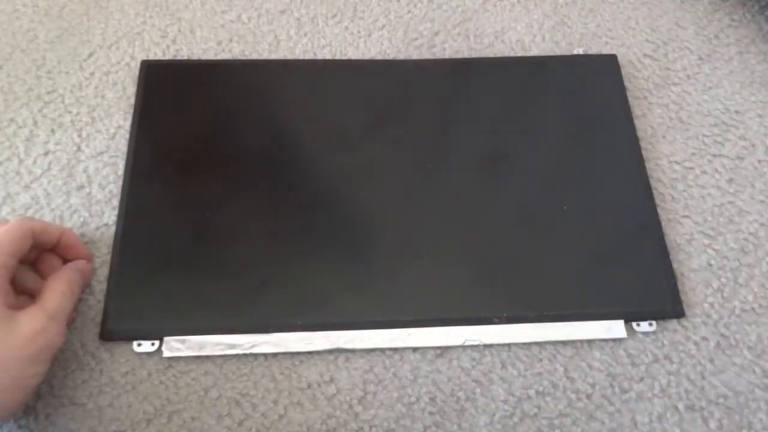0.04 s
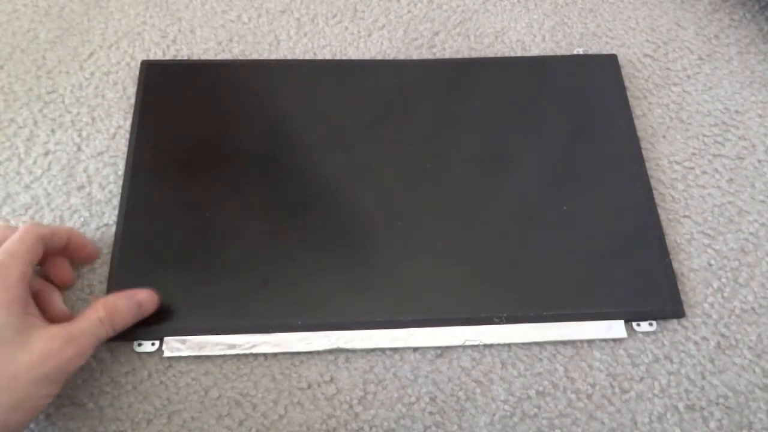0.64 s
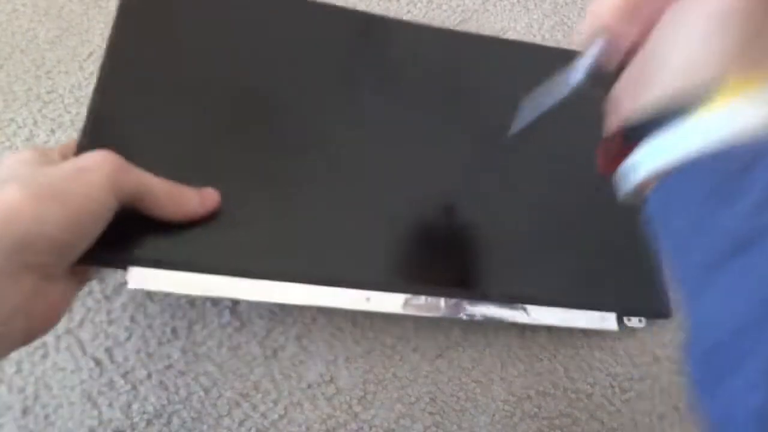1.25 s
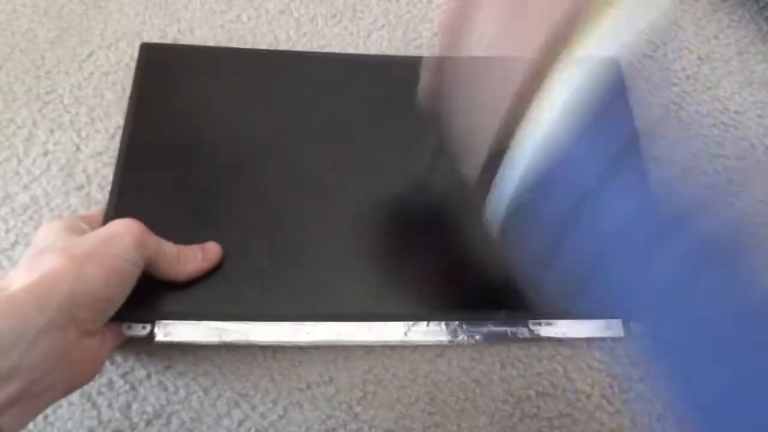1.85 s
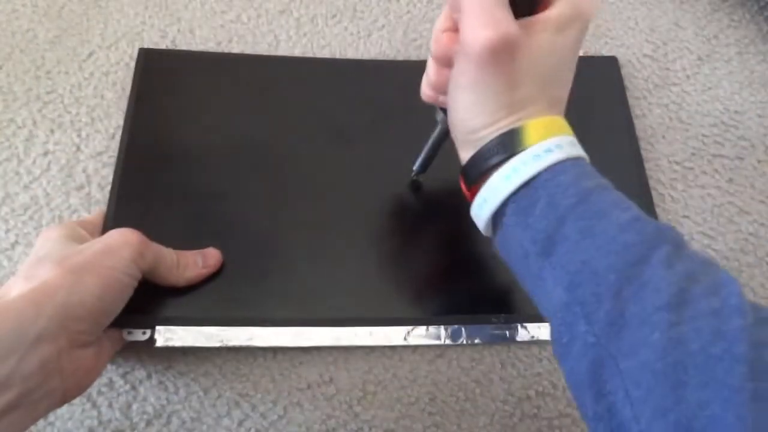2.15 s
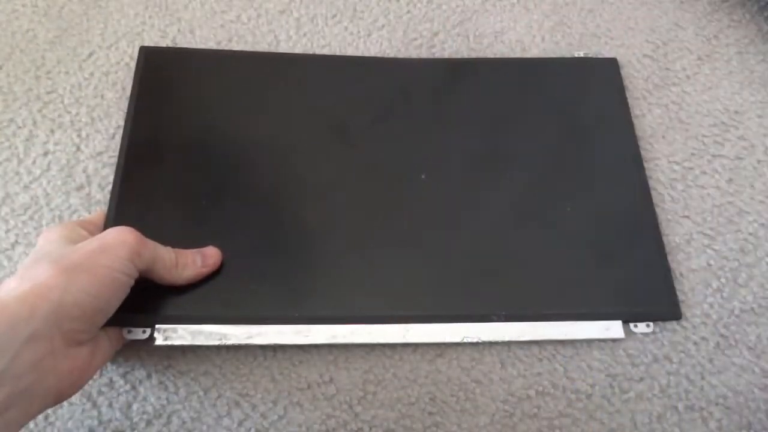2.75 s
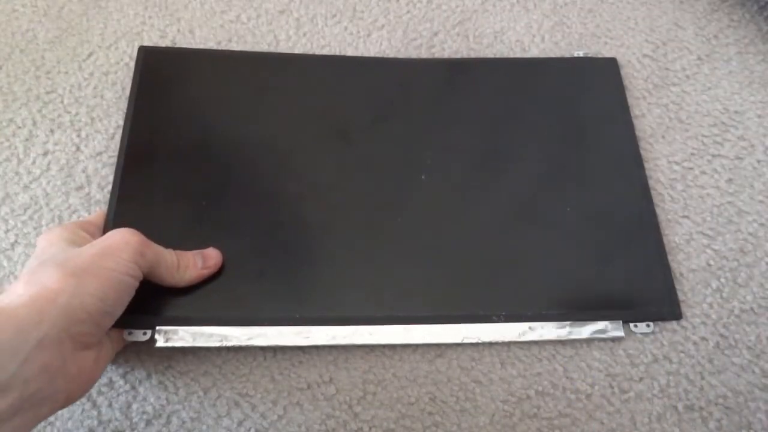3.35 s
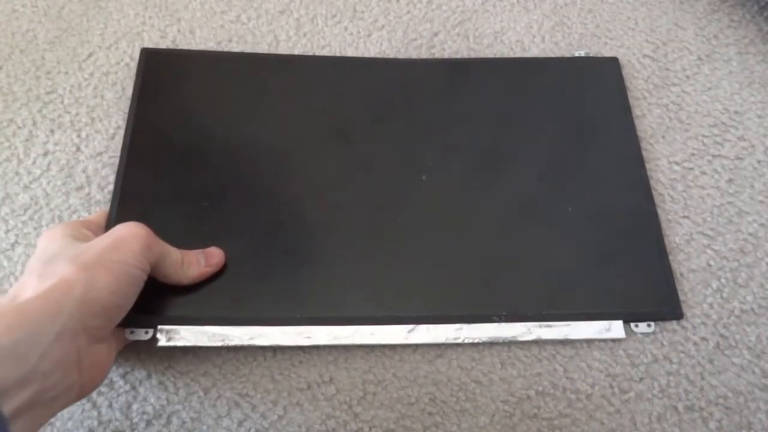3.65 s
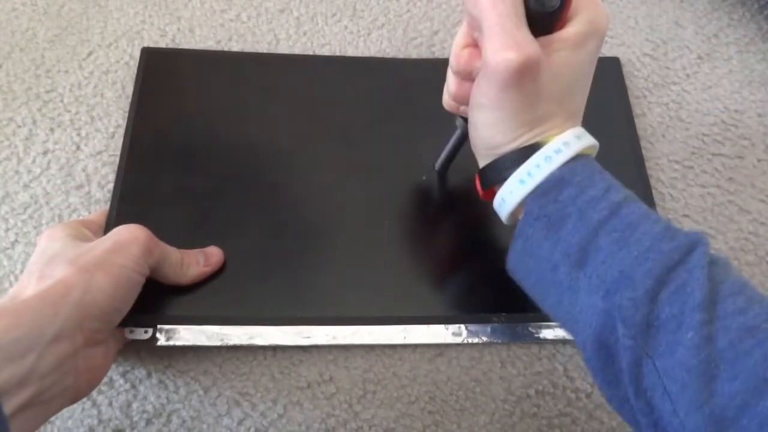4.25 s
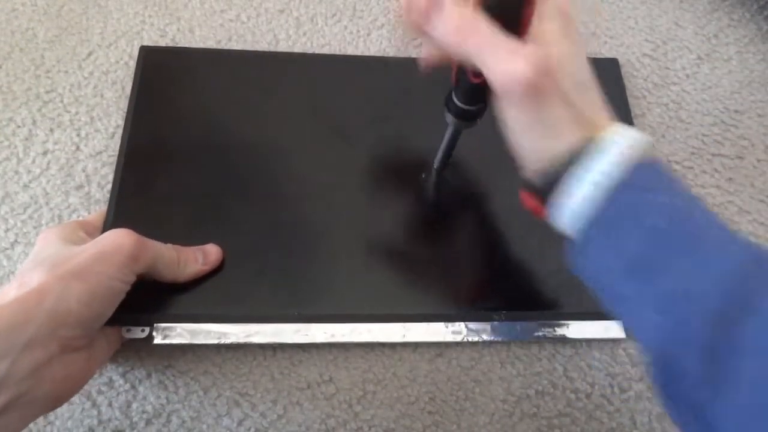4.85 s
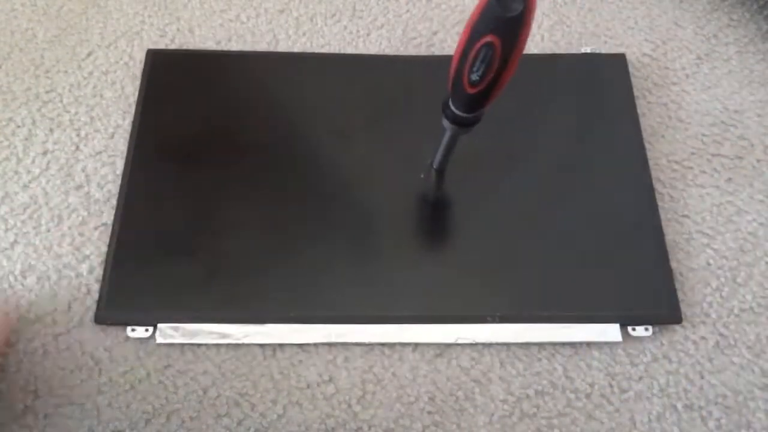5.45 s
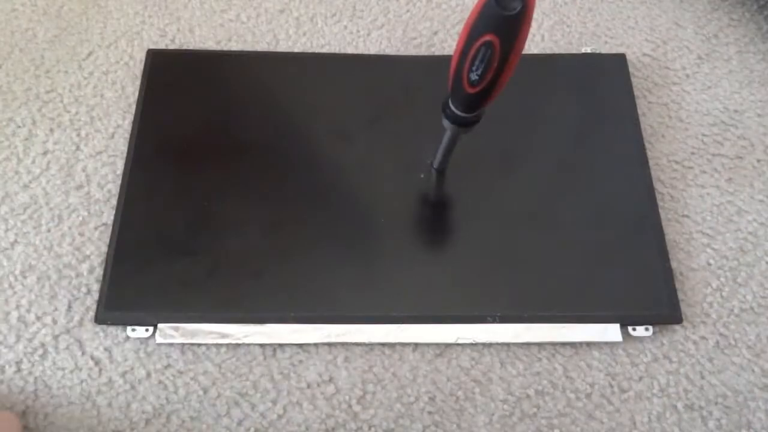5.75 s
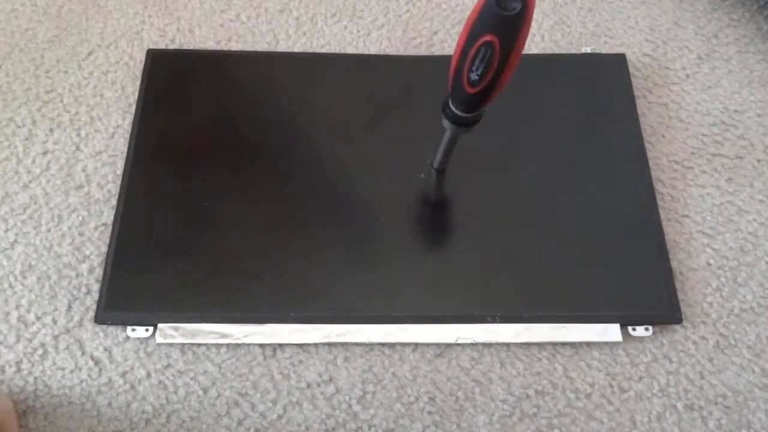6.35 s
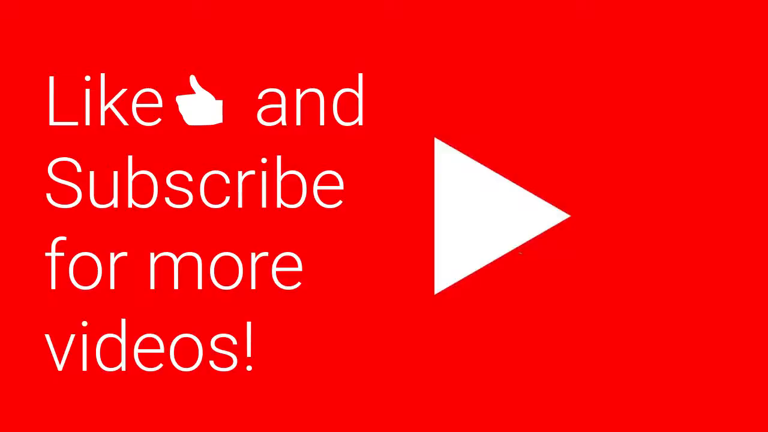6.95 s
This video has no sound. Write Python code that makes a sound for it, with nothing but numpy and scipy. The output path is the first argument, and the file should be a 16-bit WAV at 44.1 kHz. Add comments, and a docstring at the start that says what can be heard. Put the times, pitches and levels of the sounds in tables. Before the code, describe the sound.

A faint steady hiss fills a small room. At the very start, a laptop screen settles on carpet with a few soft knocks and ticks, and a sleeve rustles faintly around 1 second. After a small tick, a screwdriver stabs the screen at about 1.9 seconds: the glass cracks and crunches, the thin panel flaps and rings briefly, and the floor gives a dull thud, with a short echo. Light ticks and knocks follow between 2.3 and 2.9 seconds, the sharpest near 2.75. A second, similar stab lands at about 3.9 seconds. The damaged glass gives a little cluster of ticks around 4.8 seconds. Cloth rustles softly from 5 to 5.6 seconds, while fingers begin to rub and rumble on the camera. From 6 to 7 seconds they make close, dry bumps and clicks, strongest near 6.7, much quieter than the stabs.

```python
"""First come a faint hiss and a few ticks and knocks from a laptop screen lying on carpet in a small room.
A sleeve rustles, then a screwdriver is stabbed into the screen twice. Each stab cracks and crunches
the glass, makes the thin panel flap and ring, and thuds into the floor; the room echoes briefly.
The damaged glass keeps ticking now and then, and fingers softly rub, bump and click on a camera."""
import sys
import numpy as np
from scipy import signal
from scipy.fft import rfft, irfft, next_fast_len
from scipy.io import wavfile
from scipy.ndimage import uniform_filter1d

SR = 44100
rng = np.random.default_rng(int(sys.argv[2]) if len(sys.argv) > 2 else 0)


def dump(signal):
    """Clip the signal to [-1, 1] and save it as 16-bit WAV at the path in sys.argv[1]."""
    limited = np.clip(np.atleast_2d(signal).T, -1, 1)
    pcm = np.round(limited * 32767).astype(np.int16)
    wavfile.write(sys.argv[1], SR, pcm)


N = 312613
TIME = np.arange(N) / SR


def amp(db):
    """Turns decibels into a number to multiply by."""
    return 10 ** (np.asarray(db) / 20)


def unit(x):
    """Scales a signal to an average strength (rms) of one."""
    return x / np.sqrt(np.mean(x ** 2) + 1e-20)


def read(table, hz):
    """Looks up a value between a table's rows, on a scale of octaves."""
    f, value = np.transpose(table)
    return np.interp(np.log(hz + 1), np.log(f + 1), value)


def add(mix, s, sound):
    """Mixes a sound in at s seconds."""
    part = mix[..., max(round(s * SR), 0):][..., :sound.shape[-1]]
    part += sound[..., :part.shape[-1]]


def swell(s, rise, fall):
    """A smooth rise and fall in level that peaks at s seconds."""
    return np.exp(-((TIME - s) / np.where(TIME < s, rise, fall)) ** 2)


# How alike left and right are for most sounds: f/Hz, likeness (0 to 1)
USUAL_LIKENESS = [(50, .998), (130, .98), (500, .92), (1500, .78), (10000, .8)]

def coloured(pair, db_at, likeness=USUAL_LIKENESS):
    """Gives two unrelated noises a tone colour and blends them into left and right."""
    hz = abs(np.fft.fftfreq(pair.shape[1], 1 / SR))
    alike = np.clip(read(likeness, hz), 0, 1)
    log_gain = np.log(amp(db_at(hz)) + 1e-5)
    response = np.exp(np.conj(signal.hilbert(log_gain)))  # rings after its cause, never before
    mid, side = np.fft.ifft(np.fft.fft(pair) * response * np.sqrt([1 + alike, 1 - alike])).real
    return np.array([mid + side, mid - side])


def noise(colour, likeness=USUAL_LIKENESS, grain_db=0):
    """Stereo noise of a given tone colour; grains of uneven size make it crackle."""
    shape = (2, next_fast_len(N))
    grains = rng.standard_normal(shape) * amp(grain_db * np.minimum(rng.exponential(1, shape), 6))
    return unit(coloured(grains, lambda hz: read(colour, hz), likeness)[:, :N])


# Tone colour of the hiss: f/Hz, level/dB
HISS_COLOUR = [(20, 4), (35, -5), (60, -8), (100, -12.5), (160, -14.5), (300, -16), (510, -16), (2100, -17),
               (5000, -20), (10000, -23), (14500, -27), (15800, -30.5)]
# How alike its left and right are: f/Hz, likeness (0 to 1)
HISS_LIKENESS = [(50, 1), (200, 0.98), (600, 0.64), (2000, 0.92), (5000, 1), (12000, 1)]
# Tones of the mains hum: f/Hz, level/dB
HUM_TONES = [(60, -77), (120, -74), (240, -82)]

def hiss_and_hum():
    """A microphone hisses steadily over the faint hum of mains power."""
    hum = sum(amp(db) * np.sin(2 * np.pi * hz * TIME) for hz, db in HUM_TONES)
    return amp(-58.5) * noise(HISS_COLOUR, HISS_LIKENESS) + hum


# Shifts of the hand: peak t/s, length/s, rumble level/dB, rubbing level/dB
GRIP_SHIFTS = [(3.8, 0.58, -71, -66.5), (4.55, .1, -52.5, -69), (4.85, 0.38, -70, -67),
               (5.126, 0.11, -48.5, -63), (5.31, 0.13, -54.5, -64), (5.97, .28, -52.5, -64),
               (6.19, 0.15, -46.5, -62.5), (6.453, 0.43, -52.5, -79), (6.809, .05, -48, -46),
               (6.87, .12, -46.5, -64), (7.02, .14, -53, -62.5)]
# Tone colours of the rumble and the rubbing: f/Hz, level/dB
RUMBLE_COLOUR = [(6, -22), (11, 16), (25, 1), (49, -5), (97, -10.5), (200, -21), (260, -60), (440, -120)]
RUBBING_COLOUR = [(100, -2), (230, -2), (350, 8.5), (450, -5.5), (650, -8), (1500, -32)]

def grip():
    """A hand rumbles and rubs on the camera body each time it shifts."""
    rumble, rubbing = amp(-74.5), 0  # even a still hand rumbles a little
    for s, length, rumble_db, rubbing_db in GRIP_SHIFTS:
        shift = swell(s, length / 2, length / 2)
        rumble += amp(rumble_db) * shift
        rubbing += amp(rubbing_db) * shift
    return rumble * noise(RUMBLE_COLOUR) + rubbing * noise(RUBBING_COLOUR)


def flex(hz, decay, rise=0.00044):
    """A bent sheet or shell swings back and forth and quickly stops."""
    t = np.arange(SR // 5) / SR
    return np.sin(2 * np.pi * hz * t) * np.exp(-t / decay) * (1 - np.exp(-t / rise))


# Knocks of the panel: t/s, level/dB, f/Hz, fade time/s
SETTLING_KNOCKS = [(0.0896, -29, 383, .0013), (.095, -40.5, 78, .014), (.105, -33, 308, 0.0055),
                   (.1068, -35, 706, .0021), (.236, -49.5, 780, .005), (2.306, -32.5, 488, 0.0019),
                   (2.3212, -46, 520, .002), (2.6069, -34.5, 447, .0022), (2.608, -38, 935, 0.0027),
                   (2.772, -38.5, 140, .0042), (2.782, -34, 270, .0028)]

def panel_knocks():
    """The panel knocks softly as it settles on the carpet."""
    out = np.zeros((2, N))
    for s, db, hz, decay in SETTLING_KNOCKS:
        add(out, s, amp(db) * flex(hz, decay))
    return out


# How alike left and right are for sharp, close sounds: f/Hz, likeness (0 to 1)
SNAP_LIKENESS = [(500, .95), (2000, 0.96), (10000, 0.98)]

def snap(decay, db_at, size=2048):
    """A burst of tiny breaks that dies within milliseconds."""
    fade = np.exp(-np.arange(size) / SR / decay)
    spectrum = rfft(rng.standard_normal((2, size)) * fade)
    burst = irfft(spectrum / np.sqrt(abs(spectrum) + 1e-12)) * np.sqrt(fade)  # no one pitch stands out
    return unit(coloured(burst, db_at, SNAP_LIKENESS)) * np.sqrt(np.mean(fade ** 2))


def tick(db, hz, spread, decay, body):
    """A small snap around one pitch, coloured by the object it runs through."""
    def db_at(f):
        octaves_away = np.log2((f + 1) / hz)
        return read(body, f) - 10 * np.log10(1 + (octaves_away / spread) ** 4)
    return amp(db) * snap(decay, db_at)


# Small ticks: t/s, level/dB, f/Hz, spread/octaves, fade time/s, left over right/dB, echo level/dB
PANEL_TICKS = [(.0938, -37, 5000, 2.4, 0.0039, -4, -3.5), (.0955, -36.5, 9300, 0.099, .0024, -5, -5.5),
               (0.1057, -32, 2500, 2.4, 0.0023, -5, -7.5), (1.7197, -29, 4900, 0.93, .002, 2, -12.5),
               (1.8470, -52, 4500, 0.6, .002, 0, -12), (2.3055, -40.5, 6000, 1.4, 0.0025, 2, -17),
               (2.6083, -39.5, 1490, 1.6, .0014, 0, -16), (2.7462, -40, 9400, .34, .0024, -4, 6),
               (2.7497, -20, 4200, 0.23, .0014, -4.5, -10.5), (2.7500, -24, 6400, .45, 0.00098, -6, -8),
               (2.7505, -31, 1280, 1.36, 0.00073, -5, 0), (2.7908, -38.5, 4600, 0.66, .0039, 2, -17),
               (2.8779, -40, 4600, 0.35, 0.0025, 0, -10), (4.7865, -35, 4040, 2, .0027, 2, -7),
               (4.7875, -34.5, 4400, 0.29, .0021, 2, -13), (4.8010, -45, 7000, 0.79, 0.011, 0, -13),
               (4.8172, -39.5, 6960, 0.45, .0024, 0, -18), (4.844, -46, 6500, .8, .0012, 0, -12),
               (4.8535, -44.5, 7000, .8, .001, 0, -15), (4.8640, -47, 7000, .8, .001, 0, -15),
               (5.3738, -45, 4940, 0.3, .0012, 0, -14)]
# Tone colour the panel gives each tick: f/Hz, level/dB
PANEL_COLOUR = [(1000, 3), (2200, 2.5), (3100, -4.5), (3750, 0), (4900, 1), (5400, -1), (6000, -0.5),
                (6600, 0.5), (7300, -0.5), (8200, 3.5), (8800, -2), (9300, 4), (10000, -0.5), (11000, -3)]

def panel_ticks():
    """Glass, frame and screwdriver tip tick; returns the direct sound and the part that will echo."""
    direct, to_room = np.zeros((2, 2, N))
    for s, db, hz, spread, decay, pan_db, room_db in PANEL_TICKS:
        sound = amp([[pan_db / 2], [-pan_db / 2]]) * tick(db, hz, spread, decay, PANEL_COLOUR)
        add(direct, s, sound)
        add(to_room, s, amp(room_db) * sound)
    return direct, to_room


# Tone colour of the echo: f/Hz, level/dB
ECHO_COLOUR = [(60, -13), (220, -10.5), (400, -1.5), (750, 4.5), (1300, 2), (2100, 1), (2700, 3), (3500, 2),
               (4300, 1), (5100, 2), (5700, 1), (6300, 1.5), (8000, 1), (11000, -2)]
# How long the echo lasts: f/Hz, time to fade by 60 dB/s
ECHO_FADE = [(80, 0.3), (250, .34), (600, 0.4), (1200, 0.21), (2500, 0.38), (5000, 0.46), (8000, 0.32),
             (11000, 0.17)]

def room(sound, onset_s=0.0013):
    """Many reflections blur into one short echo, each pitch dying at its own speed."""
    reflections = coloured(rng.standard_normal((2, SR)), lambda f: read(ECHO_COLOUR, f))
    hz, t, bands = signal.stft(reflections, SR, nperseg=256)
    tail = signal.istft(bands * amp(-60 * t / read(ECHO_FADE, hz)[:, None]), SR)[1]
    tail *= 1 - np.exp(-(np.arange(tail.shape[1]) / SR / onset_s) ** 2)
    return signal.fftconvolve(sound.mean(0)[None], tail / np.linalg.norm(tail[0]), axes=1)[:, :N]


# Strokes of the sleeve: peak t/s, level/dB, rise/s, fall/s
SLEEVE_STROKES = [(1.025, -60, .018, .03), (1.17, -64.5, .12, .12), (5.14, -62, .08, .08),
                  (5.38, -56, .17, .13), (5.55, -57.5, 0.046, 0.07), (6.2, -69, 0.08, .12),
                  (6.52, -64.5, 0.12, 0.32)]
# Tone colour of the cloth: f/Hz, level/dB
CLOTH_COLOUR = [(200, -10), (700, 2), (1400, 4), (2500, 3), (5000, -3.5), (9000, -2), (11500, -5),
                (16000, -15)]

def sleeve():
    """Cloth brushes past with a grainy rustle as the arm moves."""
    strokes = sum(amp(db) * swell(s, rise, fall) for s, db, rise, fall in SLEEVE_STROKES)
    return strokes * noise(CLOTH_COLOUR, grain_db=2.5)


# The two stabs: t/s, push until the glass gives/s, shudder level/dB, crunch level/dB,
# thud level/dB, shudder's fade/(dB per s), wait until the panel springs back/s
SCREWDRIVER_STABS = [(1.864, 0.047, -25.5, -29.5, -35, 192, 0.17),
                     (3.891, 0.054, -25, -28.5, -35.5, 137, 0.2)]
# Tone colour of each shudder, set by where the tip lands: f/Hz, level/dB
FIRST_SHUDDER_COLOUR = [(120, -29), (230, -20), (310, -2), (380, 2), (500, -1.5), (650, -2.5), (770, -10),
                        (930, -7), (1150, -15.5), (2000, -51), (4000, -85)]
SECOND_SHUDDER_COLOUR = [(120, -28), (230, -13), (310, -12), (410, -3), (500, -3), (570, -2.5), (690, 0.5),
                         (820, -5.5), (960, -3.5), (1300, -12), (2000, -26), (4000, -53)]
# Tone colours of breaking glass and of the carpeted floor: f/Hz, level/dB
GLASS_COLOUR = [(100, -26), (600, -24), (1300, 2.5), (2000, 1), (2700, 2), (3600, 1), (5000, 1), (6500, -3),
                (8000, -3.5), (9500, -6), (11000, -8)]
FLOOR_COLOUR = [(20, -18), (45, -13), (66, 2.5), (100, -2.5), (145, 3), (200, -6), (300, -13.5), (600, -40)]

def stab(s, push, shudder_db, crunch_db, thud_db, fall, spring_back, shudder_colour):
    """As the tip drives in, the panel's layers slap together, the glass crunches and the floor gives."""
    t = np.maximum(TIME - s, 0)
    before, after = np.maximum(push - t, 0), np.maximum(t - push, 0)
    shudder_growth, crunch_growth, crunch_fall = 47, 67, fall + 22  # dB per s
    # springing back, the panel shudders and grates again, more softly
    rebound = swell(s + spring_back, rise=0.022, fall=0.044)
    shudder_shape = np.hypot(amp(-shudder_growth * before - fall * after), amp(-16.5) * rebound)
    crunch_shape = np.hypot(amp(-crunch_growth * before - crunch_fall * after), amp(-21.5) * rebound)
    shudder = amp(shudder_db) * shudder_shape * noise(shudder_colour)
    # glass breaks in uneven bunches a few milliseconds long
    jitter = unit(uniform_filter1d(rng.standard_normal(N), 130))
    bunches = unit(amp(1.7 * jitter))
    crunch = amp(crunch_db) * crunch_shape * bunches * noise(GLASS_COLOUR, grain_db=2.5)
    # the floor gives slowly, carries the weight of the arm, then comes to rest
    rise_s, hold_s, sag_db_per_s, release_db_per_s = 0.016, 0.15, 73, 500
    weight = amp(thud_db - sag_db_per_s * t - release_db_per_s * np.maximum(t - hold_s, 0))
    thud = np.minimum(t / rise_s, 1) * weight * noise(FLOOR_COLOUR)
    return (TIME >= s) * (shudder + crunch + thud)


def crack(db, hard_db=-24, dull_above_hz=5600):
    """Glass gives way: short and bright when hit hard, a longer, duller scrape when only touched."""
    weakness_db = max(hard_db - db, 0)
    dulling = 0.38 * weakness_db  # dB per octave
    decay = 0.0013 * 2 ** (weakness_db / 13)
    def db_at(f):
        return read(GLASS_COLOUR, f) - dulling * np.log2(np.maximum(f / dull_above_hz, 1))
    return amp(db) * snap(decay, db_at)


# Hard hits of the tip within the stabs: t/s, crack level/dB, bend level/dB, bend f/Hz
TIP_HITS = [(1.8650, -19, -15.5, 523), (1.8795, -28, -9.5, 470), (1.9030, -24, -23, 650),
            (1.9118, -17, -29, 796), (1.9142, -18, -40, 590), (1.9490, -40, -19.5, 494),
            (1.9712, -40, -31, 403), (2.0090, -45, -23.5, 604), (2.0280, -43, -33, 850),
            (2.0410, -38, -27.5, 840), (3.8920, -22.5, -21, 675), (3.9060, -41, -14.5, 620),
            (3.9228, -26, -21, 657), (3.9402, -16.5, -19.5, 685), (3.9570, -14.5, -32, 754),
            (3.9770, -33, -16, 650), (3.9960, -29, -29, 650), (4.0365, -44, -24, 560),
            (4.0845, -42, -27, 715)]
# Tones the panel rings with: f/Hz, level/dB, time to fade by 60 dB/s
RINGING_TONES = [(138, -14, 0.26), (304, -18, 0.16), (386, 4.5, 0.18), (471, -3, 0.24), (501, -3.5, 0.38),
                 (594, -4.5, 0.46), (642, -2, 0.43), (720, -19, 0.38), (779, 1.5, 0.37), (826, -8.5, .4),
                 (970, -6, 0.47), (1045, -11, 0.45), (1140, -15, 0.21), (1220, -18, .4), (1710, -15, .2),
                 (3520, -11, 0.37), (5060, -13, .42)]

def tip_hits():
    """Every hard hit cracks the glass, bends the panel and sets it ringing."""
    out, pushes = np.zeros((2, N)), np.zeros(N)
    for s, crack_db, bend_db, hz in TIP_HITS:
        add(out, s, crack(crack_db))
        add(out, s, amp(bend_db) * flex(hz, decay=0.003, rise=0.0005))
        add(pushes, s, amp([bend_db]))
    t = np.arange(SR // 2) / SR
    ring = sum(amp(db - 60 * t / fade) * np.sin(2 * np.pi * hz * t) for hz, db, fade in RINGING_TONES)
    ring *= 1 - np.exp(-t / 0.0072)  # the ringing takes a moment to build
    return out + amp(-28.5) * signal.fftconvolve(pushes, ring)[:N]


# Bumps of the fingers: t/s, level/dB, f/Hz, fade time/s
FINGER_BUMPS = [(4.352, -54, 200, 0.0021), (4.523, -51.5, 315, .015), (5.065, -48, 352, .0039),
                (5.105, -38, 187, 0.0033), (5.999, -38, 160, 0.0046), (6.0, -34.5, 322, 0.0068),
                (6.083, -43, 278, .004), (6.461, -42, 304, .0017), (6.5213, -30, 680, .0016),
                (6.714, -24, 108, 0.0027), (6.7156, -29.5, 360, 0.0042), (6.7254, -26, 324, 0.0074),
                (6.8174, -26.5, 240, 0.0017), (6.979, -38.5, 330, .0049)]

def finger_bumps():
    """Fingers bump the camera body, which answers with a short, low note."""
    out = np.zeros((2, N))
    for s, db, hz, decay in FINGER_BUMPS:
        add(out, s, amp(db) * flex(hz, decay))
    return out


# Clicks of the camera's case: t/s, level/dB, f/Hz, spread/octaves, fade time/s
CASE_CLICKS = [(6.1947, -32, 5000, 2.8, 0.00052), (6.5210, -38.5, 1600, 1.1, .001),
               (6.5240, -41, 3400, 0.34, 0.002), (6.5373, -36.5, 2480, 0.43, 0.0015),
               (6.5468, -45, 7000, 1.2, .001), (6.7143, -32, 3000, 2, 0.0015),
               (6.723, -38.5, 2800, 1.1, 0.0022)]
# Tone colour the case gives each click: f/Hz, level/dB
CASE_COLOUR = [(700, 3), (1300, 0), (2000, 3.5), (2400, 0), (3000, 2.5), (3800, -3), (4600, 0),
               (6000, -2.5), (9000, -1.5), (12000, -7), (16000, -14)]

def case_clicks():
    """The camera's case clicks under the fingers, very close and with no echo."""
    out = np.zeros(N)
    for s, db, hz, spread, decay in CASE_CLICKS:
        add(out, s, tick(db, hz, spread, decay, CASE_COLOUR).mean(0))
    return out


def scene():
    """Stabs, ticks and knocks echo in the room, over the sounds of the hand and a faint hiss."""
    first, second = SCREWDRIVER_STABS
    stabs = tip_hits() + stab(*first, FIRST_SHUDDER_COLOUR) + stab(*second, SECOND_SHUDDER_COLOUR)
    ticks, ticks_to_room = panel_ticks()
    knocks, bumps = panel_knocks(), finger_bumps()
    echo = room(amp(-9) * stabs + ticks_to_room + amp(-8) * knocks + amp(-13) * bumps)
    impacts = amp(2) * stabs + ticks + knocks + bumps + echo
    treble_cut = signal.ellip(8, 0.3, 55, 11000, fs=SR, output="sos")  # little is left above 11 kHz
    impacts = signal.sosfilt(treble_cut, impacts) * amp([[-0.2], [0.2]])  # a touch to the right
    return impacts + case_clicks() + sleeve() + grip() + hiss_and_hum()


def record(dry):
    """Rounds off the sharpest peaks, then takes away the very highest pitches."""
    ceiling, top_hz = 0.42, 15900
    rounded = dry / (1 + (dry / ceiling) ** 6) ** (1 / 6)
    treble_cut = signal.firwin(511, top_hz, window=("kaiser", 9), fs=SR)
    return signal.oaconvolve(rounded, treble_cut[None], "same")


dry = scene()
out = record(dry)
dump(out)
```